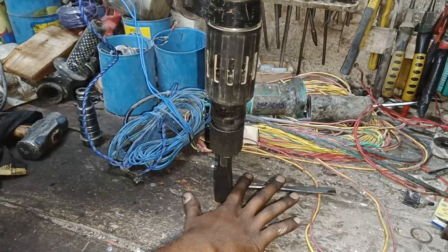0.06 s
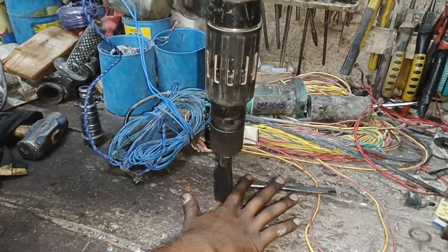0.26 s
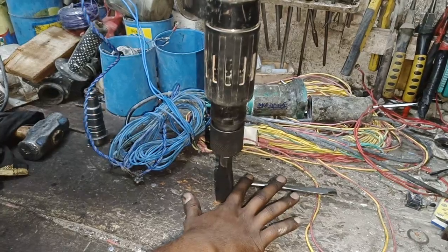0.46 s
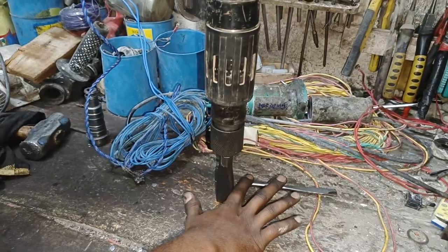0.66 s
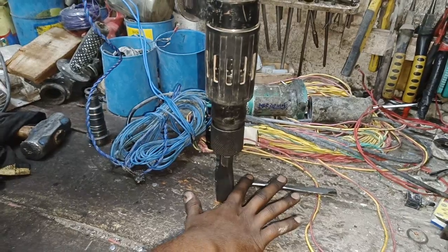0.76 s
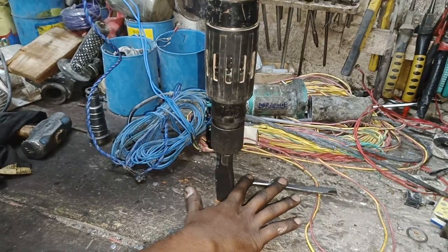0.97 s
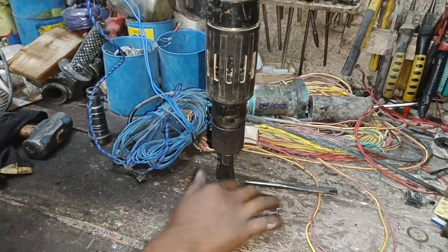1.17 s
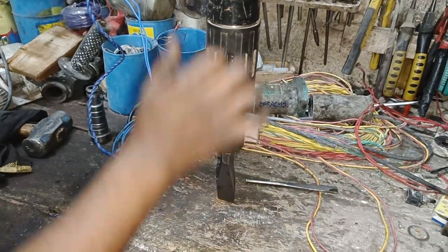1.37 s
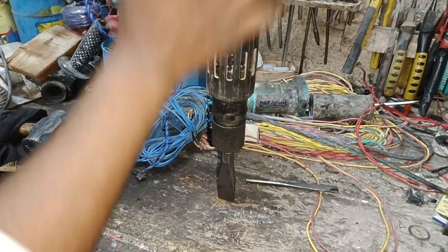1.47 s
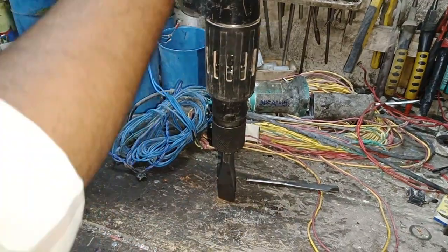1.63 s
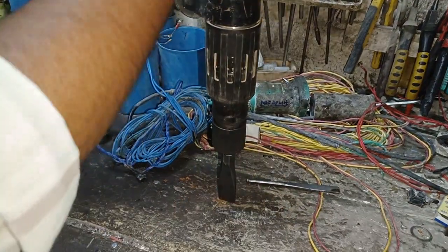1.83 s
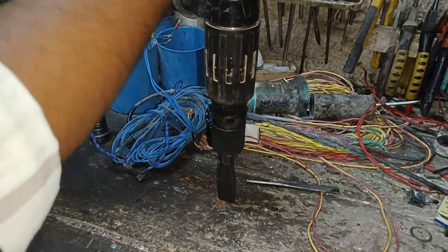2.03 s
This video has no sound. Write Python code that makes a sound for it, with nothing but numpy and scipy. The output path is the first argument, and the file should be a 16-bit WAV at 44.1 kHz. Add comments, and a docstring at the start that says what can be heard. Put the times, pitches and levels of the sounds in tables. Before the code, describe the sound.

Close by in a small workshop, a hammer drill clicks on and hammers fast, its steel bit ringing and loose parts shaking on the bench. The motor winds down, the knocks spreading further apart until they end.

```python
"""A motor snarls up as an upright hammer drill is switched on for an instant, then coasts to rest.
Its hammer strikes about thirty times a second; each impact excites the damped modes of the housing,
the steel bit and a cluttered workbench, and sets loose parts rattling. The blows slow to separate
knocks over the fading whir of the gears, in the short reverberation of a small workshop."""
import sys
import numpy as np
from scipy import signal
from scipy.fft import rfft, irfft
from scipy.io import wavfile
from scipy.ndimage import uniform_filter1d

SR = 44100
rng = np.random.default_rng(int(sys.argv[2]) if len(sys.argv) > 2 else 0)


def transcribe(u):
    """Save the signal u as a 16-bit wav file named by the first command-line argument.

    u: samples, shape (n,) or (channels, n), limited to [-1, 1]; the rate is SR.
    q: integer samples, one column per channel.
    """
    v = np.clip(np.atleast_2d(u).T, -1, 1)
    q = np.round(v * 32767).astype(np.int16)
    wavfile.write(sys.argv[1], SR, q)


N = 92610
T = np.arange(N) / SR
RING_SIZE = SR // 4
RING_T = T[:RING_SIZE]  # time since an impact

# Levels in the tables are relative.
# motor run-up and coast (time [s], speed [hammer cycles/s], level [dB])
MOTOR_RUN = [(.185, 0.89, -49), (0.201, 6.95, -21.5), (.212, 14.7, -14.5), (0.231, 26, -14),
             (0.252, 28.3, -22.5), (0.321, 33, -19.5), (0.501, 28, -29), (.75, 16, -31), (1.001, 10, -32),
             (1.22, 8.8, -31), (1.397, 4.5, -35.5), (1.501, 4.1, -39), (1.601, 2.7, -46.5),
             (1.72, 1.2, -63.5)]
# gear and brush noise (frequency [Hz], level under power [dB], level coasting [dB])
WHIR_SPECTRUM = [(100, -6, -28), (430, -9.5, -10.5), (900, -2, 5.5), (2290, 0.5, 6), (3200, -6, 2),
                 (3920, -5, 2.5), (7130, -7, -2), (6940, -13, -17.5), (9000, -12.5, -9.5),
                 (11900, -20, -16), (16000, -23.5, -20.5)]
# gear mesh tones (order [cycles per hammer cycle], level [dB])
MESH_TONES = [(55, -21), (80, -4), (111, -13)]
# casing resonances under strain (frequency [Hz], width [Hz], level [dB])
CASING_BANDS = [(1950, 60, 3), (2606, 270, 0.5), (3593, 65, 3.5)]
# clicks of the switch and gear play (time [s], level [dB])
TICK_EVENTS = [(0.188, -4.5), (1.208, -15), (1.355, -8)]
# hammer blows (time [s], knock [dB], bench thump [dB], bit ring [dB], rattle [dB])
HAMMER_BLOWS = [(0.2452, -14, 3.5, 0, 6), (0.2777, -6, -0.5, -4, 6), (0.3063, -5, -0.5, 3, 2),
                (0.3369, -12, 2.5, 0, 1), (0.3699, -9.5, 2.5, 1, 4.5), (0.4042, -4, 2, -3.5, 3.5),
                (.4410, -9, -2, -2.5, 3.5), (0.48, -10.5, -19, -10, 2.5), (0.5217, -1.5, 2, -4.5, 3),
                (0.567, -8.5, -2.5, -6.5, 1), (0.6144, -9.5, 2, -5.5, 4), (0.6683, 1, 1, -1, -3),
                (0.7255, -0.5, -1, -7.5, -1.5), (0.7877, 1, -8, -11, -6), (0.8592, 1.5, -11.5, -11, -10.5),
                (0.9394, 0, -15, -14.5, -7.5), (1.0303, 0, -19, -14, -10), (1.1357, 0, -18, -11, -11),
                (1.2641, 0.5, -19, -18, -12.5), (1.433, 1, -13, -17, -32)]
# first crack of a blow (frequency [Hz], level [dB])
CRACK_SPECTRUM = [(60, -55), (250, -6), (550, -6), (900, 5.5), (1400, -0.5), (1800, -11.5), (2500, -1.5),
                  (3300, -50), (6500, -12.5), (10000, -44), (12500, -30), (16000, -47)]
# modes of the housing and bench top (frequency [Hz], level [dB], T60 [s])
BODY_MODES = [(186.2, -8.5, 0.17), (271.2, -4, 0.16), (346.5, -4.5, 0.073), (477.7, -3, 0.09),
              (564, -3.5, 0.16), (722.3, 3, 0.1), (851, 3.5, 0.086), (920, -6.5, .1), (1110, -21, 0.079),
              (1284, 2.5, 0.089), (1469, 5.5, 0.054), (1883, 1.5, 0.052), (2307, -28, .04)]
# modes of the whole bench (frequency [Hz], level [dB], T60 [s])
BENCH_MODES = [(67, 5, 0.042), (84.8, -0.5, 0.29)]
# mode of the steel bit (frequency [Hz], level [dB], T60 [s])
BIT_MODES = [(6050, -1.5, 0.074)]
# modes of tools and cans on the bench (frequency [Hz], level [dB], T60 [s])
CLUTTER_MODES = [(192.3, -2.5, 0.27), (444.6, 2.5, 0.15), (636, -11, 0.067), (821, -5, 0.11),
                 (936, -1.5, 0.18), (1240, -1.5, 0.1), (1810, 3, .05), (2493, -1.5, .06)]
# reflections from clutter and walls (frequency [Hz], level [dB], T60 [s])
ECHO_BANDS = [(60.3, -52.5, 0.2), (203, 1, 0.06), (480, 0, 0.12), (920, -7.5, 0.3), (1420, -9, 0.14),
              (2310, -6, 0.15), (3270, -12, 0.066), (6660, -16, 0.11), (10000, -18.5, 0.051),
              (13000, -47.5, 0.068)]
# rattle of loose parts (frequency [Hz], level [dB], T60 [s])
RATTLE_BANDS = [(30.15, -43, 0.17), (79, 9.5, 0.067), (242, -4, 0.47), (736, 7.5, 0.13), (1530, -1, 0.16),
                (3250, -10, 0.033), (6500, -13.5, 0.084), (13000, -17.5, 0.17), (16000, -25.5, 0.05)]
# the bit clanging in its chuck between the fastest blows (time [s], duration [s], level [dB])
CHUCK_CLANGS = [(0.299, 0.013, -35), (0.315, 0.022, -25), (0.342, .017, -18), (.373, .011, -16),
                (.445, 0.0098, -25.5)]
# workshop background (frequency [Hz], level [dB])
BACKGROUND = [(25, -16.5), (70, -6.5), (190, -16), (300, -1.5), (400, -6.5), (620, -11.5), (950, -9.5),
              (2000, -15.5), (4500, -25), (6600, -31.5), (7600, -40.5), (16000, -59)]
# microphone pair (frequency [Hz], left minus right [dB], correlation [clipped to -1..1])
MIC_PAIR = [(40, -6, 0.93), (130, 1.5, 0.91), (405, -0.5, 0.79), (960, 0.5, -0.018), (2470, -5.5, 0.039),
            (3630, 4.5, 0.078), (4600, -4.5, -0.13), (6300, -16, 0.26), (7310, 2.5, -1.13),
            (8650, 29.5, 0.98), (9900, 9.5, -0.78), (12160, 7.5, 0.46), (15540, -3, -0.21)]


def amp(db):
    """Amplitude ratio of a level in decibels."""
    return 10 ** (np.asarray(db) / 20)


def unit(x):
    """Normalisation to an rms of 1."""
    return x / np.sqrt(np.mean(x ** 2) + 1e-20)


def decay(t60):
    """Exponential damping: 60 dB in t60 seconds."""
    return np.exp(-np.log(1000) * RING_T / t60)


def read(table, hz, column=1):
    """Interpolation of a column over log frequency."""
    rows = np.array(table)
    return np.interp(np.log(hz + 1), np.log(rows[:, 0] + 1), rows[:, column])


def add(mix, start, sound):
    """Superposition of a sound from a start time in seconds."""
    part = mix[:, max(round(start * SR), 0):][:, :sound.shape[-1]]
    part += sound[..., :part.shape[1]]


def noise(table, size, column=1):
    """Partial coherence: coloured noise at two microphones, alike in the bass."""
    hz = np.fft.rfftfreq(size, 1 / SR)
    common, opposed = rfft(rng.standard_normal((2, size)))
    angle = np.arccos(np.clip(read(MIC_PAIR, hz, column=2), -1, 1)) / 2
    common, opposed = common * np.cos(angle), opposed * np.sin(angle)
    pair = np.array([common + opposed, common - opposed])
    return unit(irfft(pair * amp(read(table, hz, column)), size))


def resonance(hz, width_hz, size):
    """A randomly driven resonator gives narrow-band noise; its centre may glide."""
    pole = np.exp(-np.pi * width_hz / SR)
    envelope = rng.standard_normal((2, size)) + 1j * rng.standard_normal((2, size))
    for _ in range(2):
        envelope = signal.lfilter([1 - pole], [1, -pole], envelope)
    carrier = np.exp(2j * np.pi * np.cumsum(hz * np.ones(size)) / SR)
    return unit((envelope * carrier).real)


def motor(power_off_s=0.292, fade_s=0.063, strain_s=0.231, strain_width_s=0.0077):
    """Forced vibration: brushes and gears rasp; under power, mesh tones follow the speed."""
    times, speed, db = np.transpose(MOTOR_RUN)
    flutter = 1 + 0.0055 * unit(uniform_filter1d(rng.standard_normal(N), size=200))
    cycles = np.cumsum(np.interp(T, times, speed) * flutter) / SR
    power = np.clip((power_off_s - T) / fade_s + 1, 0, 1)
    coast = noise(WHIR_SPECTRUM, N, column=2)
    coast += amp(-14) * resonance(hz=3750, width_hz=150, size=N)  # gearbox
    rasp = power * noise(WHIR_SPECTRUM, N) + (1 - power) * coast
    rasp *= 1 + 0.25 * np.sin(2 * np.pi * 9 * cycles)  # modulated by the turning rotor
    mesh = sum(amp(level) * np.sin(2 * np.pi * (order * cycles + rng.random((2, 1))))
               for order, level in MESH_TONES)
    strain = np.exp(-((T - strain_s) / strain_width_s) ** 2)  # the casing rings during run-up
    casing = strain * sum(amp(level) * resonance(hz, width, N) for hz, width, level in CASING_BANDS)
    return amp(np.interp(T, times, db)) * (T > times[0]) * (rasp + power * mesh + casing)


def ticks():
    """Light impacts of the switch and gear play give heavily damped broadband transients."""
    out = np.zeros((2, N))
    for start, db in TICK_EVENTS:
        tick = noise(WHIR_SPECTRUM, RING_SIZE) * decay(t60=0.04)
        add(out, start, amp(db) * unit(tick) / np.sqrt(RING_SIZE))
    return out


def crack():
    """A minimum-phase impulse of energy 1, concentrated at the instant of contact."""
    hz = abs(np.fft.fftfreq(RING_SIZE, 1 / SR))
    log_gain = np.log(amp(read(CRACK_SPECTRUM, hz)))
    click = np.fft.ifft(np.exp(np.conj(signal.hilbert(log_gain)))).real
    return -click / np.linalg.norm(click)


def diffuse_burst(bands):
    """Dense echoes or rattles merge into noise of energy 1, each band damped at its own rate."""
    hz, t, spectrum = signal.stft(noise(bands, RING_SIZE), SR, nperseg=256)
    t60 = read(bands, hz, column=2)[:, None]
    _, burst = signal.istft(spectrum * amp(-60 * t / t60), SR)
    return unit(burst[:, :RING_SIZE]) / np.sqrt(RING_SIZE)


def modal_ring(modes, detune, right_lag_s=0, vary_db=0):
    """Free vibration is a sum of damped modes, here of alternating sign and randomly detuned."""
    t = RING_T - np.array([[0], [right_lag_s]])
    chance = rng.standard_normal((len(modes), 2))
    return sum((-1) ** k * amp(db + vary_db * chance[k, 0]) * decay(t60)
               * np.sin(2 * np.pi * hz * (1 + detune * chance[k, 1]) * t)
               for k, (hz, db, t60) in enumerate(modes))


def squeal(start, bit_db, climb_hz_per_s=390, sag_hz=1540, glide_s=0.00297):
    """Steel chatter drives a rising resonance, higher on late blows, more damped on weak ones."""
    hz = 12200 + climb_hz_per_s * start - sag_hz * np.exp(-RING_T / glide_s)
    t60 = 0.17 * np.exp(0.045 * bit_db)
    db = -20 + 0.78 * bit_db + 1.5 * rng.standard_normal()
    return amp(db) * decay(t60) * resonance(hz, width_hz=730, size=RING_SIZE)


def thud(delay_s=0.02848, width_s=0.003):
    """The tool drops back on the bench; the long contact gives a low-frequency pulse."""
    u = (RING_T - delay_s) / width_s
    return (1 - u ** 2) * np.exp(-u ** 2 / 2)


def hammer(echo_rise_s=0.0053, rebound_s=0.0076, jitter_s=0.0003, clutter_delay_s=0.0019):
    """Impact excitation: each blow cracks, rebounds and rings housing, bench, bit and loose parts."""
    out = np.zeros((2, N))
    click = amp(9) * crack()
    echo = amp(9.5) * diffuse_burst(ECHO_BANDS) * np.minimum(RING_T / echo_rise_s, 1)
    for start, knock_db, thump_db, bit_db, rattle_db in HAMMER_BLOWS:
        body = amp(-18.5) * modal_ring(BODY_MODES, detune=0.004, right_lag_s=0.00011, vary_db=1)
        add(out, start, amp(knock_db) * (click + echo + body))
        for channel in np.eye(2):
            rebound_at = start + rebound_s + jitter_s * rng.standard_normal()
            add(out, rebound_at, channel[:, None] * amp(knock_db - 2.5) * click)
        bench = modal_ring(BENCH_MODES, detune=0.025, right_lag_s=0.0006)
        add(out, start, amp(thump_db - 20.5) * bench)
        add(out, start, amp(2 * thump_db - 15.5) * thud())  # grows as the square of the thump
        add(out, start, amp(bit_db - 16) * modal_ring(BIT_MODES, detune=0.002))
        add(out, start, amp(rattle_db + 12.5) * diffuse_burst(RATTLE_BANDS))
        shaken_at = start + clutter_delay_s * rng.random()
        clutter = modal_ring(CLUTTER_MODES, detune=0.0046, right_lag_s=-0.00011, vary_db=1)
        add(out, shaken_at, amp(rattle_db - 23) * clutter)
        add(out, start, squeal(start, bit_db))
    return out


def clangs(hz=6003):
    """Friction in the chuck drives the bit: a gritty tone that swells and is choked again."""
    out = np.zeros((2, N))
    for start, duration, db in CHUCK_CLANGS:
        t = np.arange(0, duration, 1 / SR)
        tone = np.sqrt(2) * np.sin(2 * np.pi * (hz * t + rng.random((2, 1))))
        grit = 0.31 * resonance(hz, width_hz=350, size=len(t))
        add(out, start, amp(db) * np.sin(np.pi * t / duration) * (tone + grit))
    return out


def reverberation(sound):
    """Convolution with the room's diffuse, exponentially decaying impulse response."""
    response = rng.standard_normal((2, RING_SIZE)) * decay(t60=0.17)
    return signal.fftconvolve(sound, response / np.linalg.norm(response[0]), axes=1)[:, :N]


def scene(low_cut_hz=46):
    """Superposition of drill and room, coloured differently at each microphone, over steady noise."""
    drill = hammer() + clangs() + motor() + ticks()
    drill += amp(-14) * reverberation(drill)
    drill = signal.sosfilt(signal.butter(2, low_cut_hz, "highpass", fs=SR, output="sos"), drill)
    left_ratio = amp(read(MIC_PAIR, np.fft.rfftfreq(N, 1 / SR)))
    sides = np.array([left_ratio, np.ones_like(left_ratio)]) / np.sqrt((1 + left_ratio ** 2) / 2)
    return irfft(rfft(drill) * sides, N) + amp(-37.5) * noise(BACKGROUND, N)


def record(dry, ceiling=0.89, cutoff_hz=15850):
    """Soft saturation rounds the loudest peaks; a low-pass filter limits the band."""
    limited = dry / (1 + (dry / ceiling) ** 4) ** 0.25
    lowpass = signal.firwin(511, cutoff_hz, window=("kaiser", 9), fs=SR)
    return signal.oaconvolve(limited, lowpass[None], "same")


dry = scene()
out = record(dry)
transcribe(out)
```